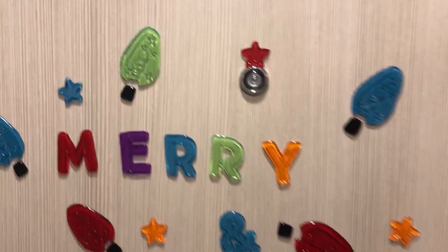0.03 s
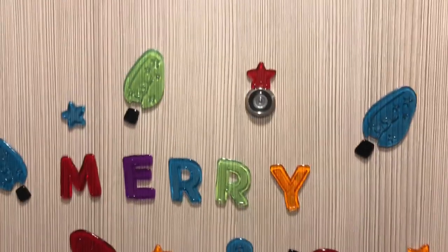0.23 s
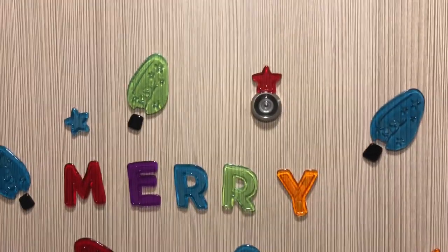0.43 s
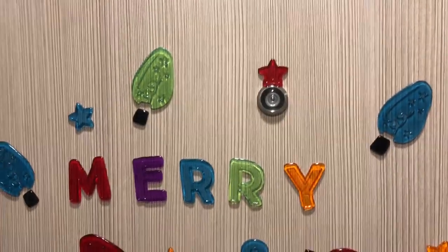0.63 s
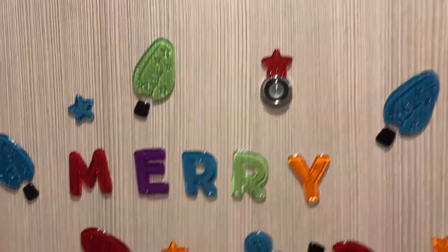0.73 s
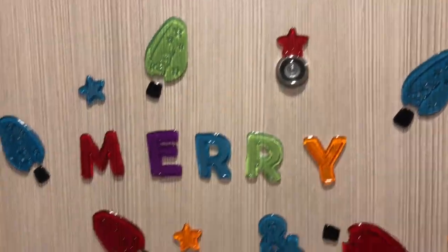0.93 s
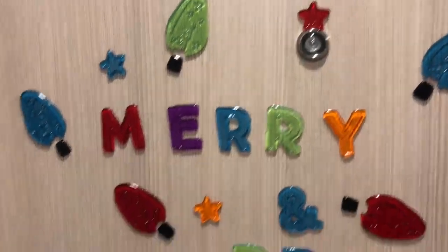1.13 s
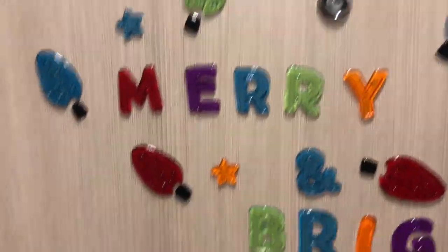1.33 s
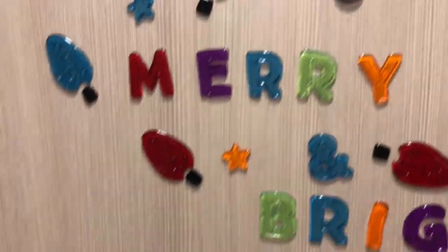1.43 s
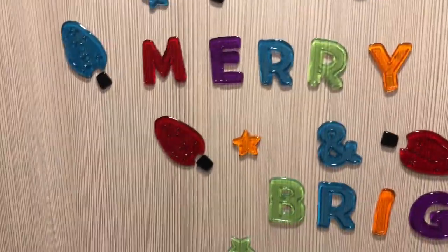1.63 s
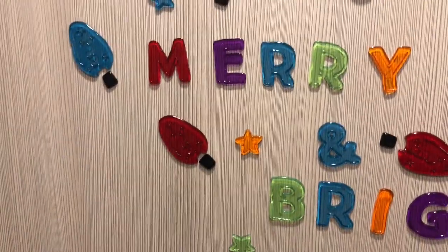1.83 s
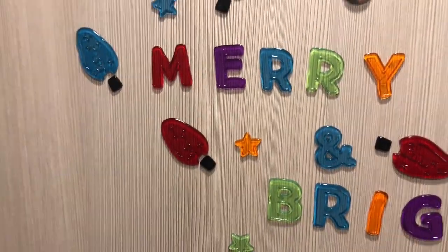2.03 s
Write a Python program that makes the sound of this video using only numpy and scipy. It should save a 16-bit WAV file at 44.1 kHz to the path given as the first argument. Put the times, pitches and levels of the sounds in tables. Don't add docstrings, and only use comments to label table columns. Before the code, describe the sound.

Five even, quick door knocks with a short woody ring, then near quiet with faint knob squeaks, and finally a much louder metal latch clack; close microphone, slight indoor corridor echo, low ventilation hum.

```python
import sys
import numpy as np
from scipy import signal
from scipy.fft import rfft, irfft
from scipy.io import wavfile
from scipy.ndimage import uniform_filter1d

SR = 44100
rng = np.random.default_rng(int(sys.argv[2]) if len(sys.argv) > 2 else 0)


def invert_db(level):
    return 10 ** (np.asarray(level, dtype=float) / 20)


def to_wav(s):
    ch = np.atleast_2d(s).T
    pcm = np.round(np.clip(ch, -1, 1) * 32767)
    wavfile.write(sys.argv[1], SR, pcm.astype(np.int16))


N = 91375


def evened(x):
    return x / np.sqrt(np.mean(x ** 2) + 1e-20)


def read(points, hz):
    f, value = np.transpose(points)
    return np.interp(np.log(hz + 1), np.log(f + 1), value)


def add(mix, start_s, sound):
    part = mix[round(start_s * SR):][:len(sound)]
    part += sound[:len(part)]


def coloured(x, points):
    hz = np.fft.rfftfreq(len(x), 1 / SR)
    return irfft(rfft(x) * invert_db(read(points, hz)) * (hz / (hz + 12)) ** 4, len(x))


def curve(rows, column=1):
    rows = np.array(rows, float)
    return np.interp(np.arange(N) / SR, rows[:, 0], rows[:, column], -150, -150)


def resonate(x, hz, width_hz):
    turn = np.exp(2j * np.pi * np.cumsum(hz * np.ones(len(x))) / SR)
    r = np.exp(-np.pi * abs(width_hz) / SR)
    return 2 * (turn * signal.lfilter([1 - r], [1, -r], x / turn)).real


def modes(table, count=1, spread=0.):
    t = np.arange(SR // 2) / SR
    out = np.zeros(len(t))
    for hz, db, t60_s in table:
        for k in range(count):
            detune = 1 + spread * (k > 0) * rng.standard_normal()
            out += invert_db(db - 60 * t / t60_s) * np.sin(2 * np.pi * hz * detune * t + 6 * rng.random())
    return out / np.sqrt(count)


# frequency in Hz, level in dB.
VENTILATION = [(15, -42), (25, -12), (64, 1), (153, 0), (545, -16.5), (887, -21.5), (1160, -21.5),
               (1290, -26), (16000, -47)]
# frequency in Hz, width in Hz, level in dB.
DRONES = [(76.1, 7.5, -61), (137, 28, -59), (308, 29, -73), (356.6, 24, -68.5), (517, 1.6, -75.5),
          (2930, 31, -85.5), (4370, 55, -88), (7180, 21, -85), (7850, 22, -82.5)]


def hum():
    out = invert_db(-53) * evened(coloured(rng.standard_normal(N), VENTILATION))
    for hz, width_hz, db in DRONES:
        narrow = resonate(rng.standard_normal(N), hz, width_hz)
        out += invert_db(db) * evened(resonate(narrow, hz, 3 * width_hz))
    return out


# frequency in Hz, t60 in seconds.
CORRIDOR = [(100, 1), (260, 0.39), (700, 0.7), (1800, 0.29), (4000, 0.25), (10000, 0.18)]


def corridor(x):
    first_wall_s = 0.0062
    taps, at = np.zeros(SR), np.arange(0, SR - 20, 20)
    taps[at + rng.integers(0, 20, len(at))] = rng.choice([-1., 1.], len(at))
    taps *= np.clip(np.arange(SR) / SR / first_wall_s - .5, 0, 1)
    hz, t, z = signal.stft(taps, SR, nperseg=256)
    decay = invert_db(-60 * t / read(CORRIDOR, hz)[:, None])
    tail = signal.istft(z * decay, SR, nperseg=256)[1]
    return signal.fftconvolve(x, tail / np.linalg.norm(tail))[:N]


# time in seconds, level in dB.
BRUSH = [
    (.222, -85),
    (.229, -56),
    (.248, -51),
    (.256, -47.5),
    (.275, -52.5),
    (.29, -65),
    (.33, -63),
]
# frequency in Hz, level in dB.
CLOTH = [(710, -25), (1200, -4.5), (1540, -5.5), (2020, -11.5), (2250, -6.5), (4360, -10.5), (8000, -14),
         (16000, -33)]


def sleeve():
    clumps = evened(uniform_filter1d(rng.standard_normal(N), size=120))
    grit_db = 2 * np.minimum(rng.exponential(1, N), 5) + 2.2 * clumps
    grit = rng.standard_normal(N) * invert_db(grit_db)
    rustle = evened(coloured(grit, CLOTH)) + 0.16 * evened(resonate(grit, 4300, 500))
    return evened(rustle) * invert_db(curve(BRUSH))


# start in seconds, level in dB, centre in Hz, width in Hz, t60 in seconds.
TICKS = [(.2288, -54, 6500, 3000, .02), (.2443, -49, 4400, 400, .03), (.2505, -52, 5500, 600, .02),
         (.254, -52, 7000, 2500, .015), (.2542, -49, 3100, 500, .03), (.2545, -44, 1560, 300, .03),
         (1.0592, -52, 6460, 1500, 0.015), (1.064, -53, 1450, 1800, 0.064), (1.384, -58, 3000, 2500, 0.03),
         (1.3845, -48, 1550, 400, 0.04), (1.3888, -39, 904, 400, 0.03), (1.389, -39, 560, 150, 0.07),
         (1.409, -53, 6000, 5830, 0.041), (1.411, -45, 1500, 1300, 0.07), (1.4165, -47, 900, 900, .1),
         (1.746, -68, 4370, 6000, 1), (1.760, -60, 4660, 3000, 0.039), (1.760, -63, 12000, 6000, .012),
         (1.7765, -59, 9000, 9100, 0.01), (1.802, -60, 3050, 500, 0.034), (1.897, -47.5, 830, 1350, 0.24),
         (1.906, -56.5, 5960, 3000, 0.067), (1.907, -46.5, 2600, 1460, 0.09)]


def ticks():
    out, t = np.zeros(N), np.arange(5000) / SR
    for start_s, db, hz, width_hz, t60_s in TICKS:
        band = resonate(resonate(rng.standard_normal(5000), hz, width_hz), hz, width_hz)
        add(out, start_s, evened(band) * invert_db(db - 60 * t / t60_s) * np.minimum(t / .0008, 1))
    return out


# time in seconds, pitch in Hz, level in dB.
CREAK = [
    (1.42, 940, -71),
    (1.53, 945, -74),
    (1.62, 936, -64.5),
    (1.70, 1030, -69),
    (1.76, 1210, -57.5),
    (1.83, 1180, -68.5),
    (1.89, 1040, -60.5),
]


def creak():
    hz = np.maximum(curve(CREAK), 800)
    whistle = resonate(resonate(rng.standard_normal(N), hz, 380), hz, 180)
    return evened(whistle) * invert_db(curve(CREAK, column=2))


# centre in seconds, half length in seconds, pitch in Hz, level in
# dB.
SQUEAKS = [
    (1.695, .045, 1288, -64),
    (1.53, .06, 880, -66),
    (1.62, .05, 1742, -73),
    (1.70, .06, 212, -55),
    (1.73, .04, 1035, -67),
]


def squeaks():
    out, t = np.zeros(N), np.arange(N) / SR
    for centre_s, half_s, hz, db in SQUEAKS:
        waver = uniform_filter1d(rng.standard_normal(N), size=900)
        tone = np.sin(2 * np.pi * np.cumsum(hz * (1 + 0.15 * waver)) / SR)
        out += invert_db(db + 2.5) * tone * np.exp(-((t - centre_s) / half_s) ** 2)
    return out


# extra delay in ms, travel at 1 kHz in ms, level in dB.
PATHS = [(0, 2.3, 0), (2.0, 2.3, -14), (4.2, 2.0, -11), (7.1, 1.58, -2), (10.0, 1.7, -7)]
# frequency in Hz, level in dB.
LEAF = [(40, -21), (110, -4.5), (270, -1.5), (600, -4.5), (1200, -1.5), (2300, -8.5), (3600, -31),
        (6000, -57)]
# frequency in Hz, level in dB, t60 in seconds.
DOOR = [(145, -11, 0.27), (187.1, -15, 1), (243.2, -4, 0.36), (348.1, -7.5, 0.46), (347, -4.5, 0.093),
        (427.4, -4, 0.23), (463, -14, 0.5), (555.7, -8.5, 0.18), (669.4, -13, 0.27), (745.7, 4.5, 0.084),
        (816, -5, 0.15), (1072, -23, 0.061), (1203, -1.5, 0.094), (1294, 2.5, 0.061)]


def leaf():
    hz, t = np.fft.rfftfreq(SR // 2, 1 / SR), np.arange(SR // 2) / SR
    arrivals = 0
    for delay_ms, travel_ms, db in PATHS:
        lag_ms_hz = hz * delay_ms + 2 * travel_ms * np.sqrt(1000 * hz)
        loss_db = -.2 * delay_ms * hz / 1000
        arrivals = arrivals + invert_db(db + loss_db) * np.exp(-2j * np.pi * lag_ms_hz / 1000)
    wave = irfft(arrivals * invert_db(read(LEAF, hz)), SR // 2) * (t < .06)
    noise = np.diff(rng.standard_normal(len(t) + 1))
    scatter = evened(coloured(noise, LEAF)) * invert_db(-6 - 60 * t / 0.04)
    ring = (invert_db(-11.5) * modes(DOOR) + scatter) * np.clip((t - .002) / 0.0012, 0, 1)
    return invert_db(2.5) * wave / abs(wave).max() + ring


def blow(body, contact_ms):
    bone_share = 0.041
    u = np.arange(-88, 89) / (SR * contact_ms / 4000)
    flesh, bone = np.exp(-.5 * u ** 2), np.exp(-2 * u ** 2)
    push = (1 - bone_share) * flesh / flesh.sum() + bone_share * bone / bone.sum()
    return signal.oaconvolve(body, push)[88:]


# start in seconds, peak in dB, knuckle contact in ms.
KNOCKS = [
    (0.178, -19.5, 0.86),
    (0.382, -20, 0.78),
    (0.5705, -19, 0.55),
    (0.7431, -18.5, 0.48),
    (.9180, -18.5, 0.41),
]


def knocks(body):
    out, t = np.zeros(N), np.arange(900) / SR
    for start_s, db, contact_ms in KNOCKS:
        add(out, start_s - .0008, invert_db(db) * blow(body, contact_ms))
        hiss = rng.standard_normal((2, 900))
        skin = evened(resonate(resonate(hiss[0], 2850, 920), 2900, 1100))
        skin = skin + invert_db(-5) * evened(resonate(hiss[1], 6800, 2700)) + invert_db(-18) * hiss[1]
        add(out, start_s, invert_db(db - 17.5 - 60 * t / 0.025 - 33.0 * contact_ms) * skin)
    return out


# frequency in Hz, level in dB, t60 in seconds.
LOCK = [(1000, -2.5, 0.048), (1047, -9, 0.15), (1234, -0.5, 0.028), (1527, -1, .045), (1765, -12, 0.053),
        (2815, 4.5, 0.028), (2573, -2.5, 0.016), (3200, -13, 0.0084), (4250, -23, 0.03),
        (5360, -2.5, 0.018), (7100, -20, .025), (8080, -2, 0.031), (8540, 4, 0.02), (9540, -7, 0.015)]


def struck(part_hz):
    db_per_octave = 10
    return [(hz, db - db_per_octave * abs(np.log2(hz / part_hz)), t60_s) for hz, db, t60_s in LOCK]


# frequency in Hz, level in dB.
STEEL = [(88, -40), (150, 0), (1040, 0), (1450, -1.5), (1760, 2), (2180, -2), (2870, -3.5), (9630, -6),
         (16000, -24.5)]


def steel_noise():
    return evened(coloured(rng.standard_normal(4000), STEEL))


# time in seconds, force in dB.
SCRAPE = [
    (1.9265, -52),
    (1.929, -26.5),
    (1.945, -25.5),
    (1.96, -26.5),
    (1.975, -23.5),
    (1.99, -25.5),
    (2.0, -25.5),
]


def scrape():
    slips_per_s, spread_db = 12000, 2
    metal = modes(LOCK, count=3, spread=0.024)
    slips = (rng.random(N) < slips_per_s / SR) * rng.standard_normal(N)
    slips = evened(slips * invert_db(spread_db * np.minimum(rng.exponential(1, N), 4)))
    force = slips * invert_db(curve(SCRAPE))
    direct = coloured(force, STEEL) / np.sqrt(np.mean(coloured(slips, STEEL) ** 2))
    ring = signal.oaconvolve(force, metal / np.linalg.norm(metal))[:N]
    return invert_db(-4.0) * direct + invert_db(-6) * ring


# start in seconds, level in dB, part struck in Hz.
CATCHES = [(1.9293, -21.5, 2860), (1.9312, -19.5, 1000), (1.939, -21.5, 1700), (1.951, -18.5, 4170),
           (1.9561, -24, 1770), (1.9582, -22.5, 2900), (1.9624, -19, 2900), (1.9682, -25, 3000),
           (1.9782, -30, 4200), (1.9795, -17.5, 3200)]


def catches():
    out, t = np.zeros(N), np.arange(4000) / SR
    for start_s, db, part_hz in CATCHES:
        ring = modes(struck(part_hz), count=2, spread=0.013)[:4000]
        add(out, start_s, invert_db(db - 3.5 - 60 * t / 0.021) * ring)
        crack = np.minimum(t / 0.00028, 1) * steel_noise()
        add(out, start_s, invert_db(db - 2.5 - 60 * t / 0.022) * crack)
    return out


# start in seconds, level in dB, part struck in Hz.
SLAM = [
    (1.991, -3, 2820),
    (1.9925, -4.5, 1380),
    (1.9950, -7.5, 1140),
    (1.9984, -10, 2830),
    (2.002, -18.5, 1400),
    (2.0055, -9, 700),
]


def slam(body):
    out, t = np.zeros(N), np.arange(4000) / SR
    ring_rise = np.minimum(np.arange(SR // 2) / 62.0, 1)
    for start_s, db, part_hz in SLAM:
        ring = modes(struck(part_hz), count=2, spread=0.015) * ring_rise
        add(out, start_s, invert_db(db - 7.5) * ring)
        add(out, start_s, invert_db(db - 10 - 60 * t / 0.016) * steel_noise())
        add(out, start_s, invert_db(db - 11.5) * blow(body, 1.83))
    hit_s = SLAM[0][0]
    add(out, hit_s, invert_db(-18.5 - 60 * t / 0.095) * steel_noise())
    shudder = np.sin(2 * np.pi * 80 * t) + 0.89 * np.sin(2 * np.pi * 150 * t)
    add(out, hit_s, invert_db(-39) * np.minimum(t / 0.0065, 1) * shudder)
    return out


def scene():
    body = leaf()
    raps = knocks(body)
    lock = scrape() + catches() + slam(body)
    small = ticks() + sleeve() + creak() + squeaks()
    wet = corridor(raps + invert_db(-1.5) * lock + invert_db(0.5) * small)
    return (raps + lock + small + invert_db(-11.5) * wet + hum())[None]


def low_pass(x):
    return signal.sosfilt(signal.butter(12, 16630, fs=SR, output="sos"), x)


def record(dry):
    fade_start_s, fade_s = 0.084, 0.053
    fade = np.clip((np.arange(N) / SR - fade_start_s) / fade_s, 0, 1) ** 0.88
    edge = signal.firwin(255, 16100, window=("kaiser", 8), fs=SR)
    mix = signal.oaconvolve(dry * fade, edge[None], "same")
    return low_pass(mix)


dry = scene()
out = record(dry)
to_wav(out)
```